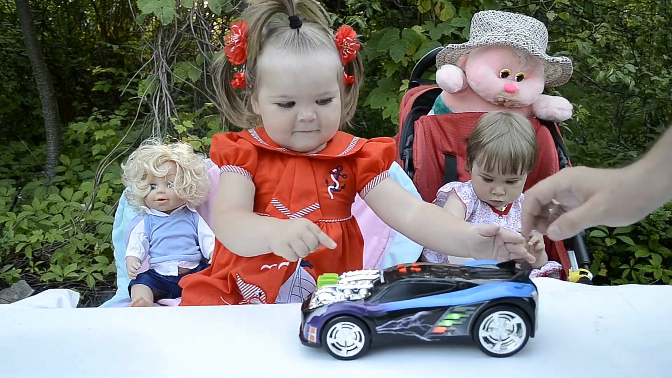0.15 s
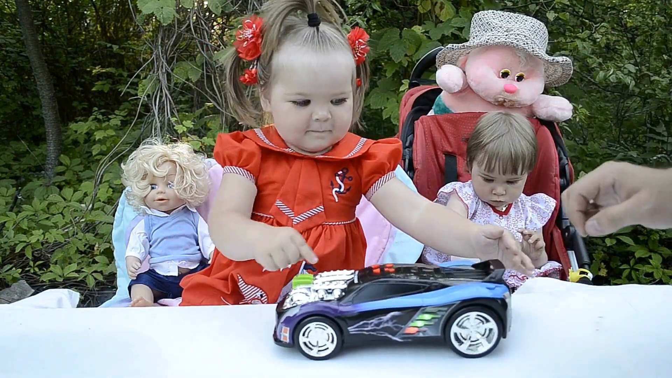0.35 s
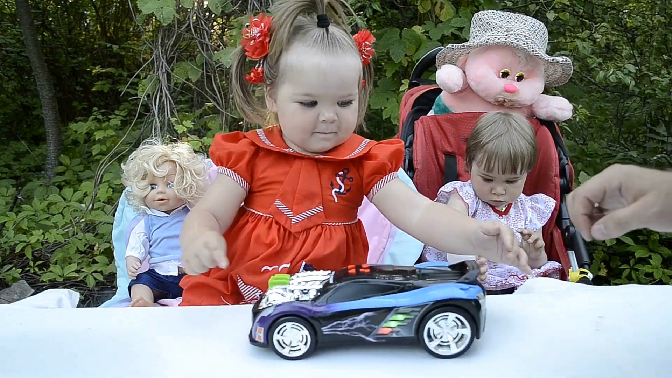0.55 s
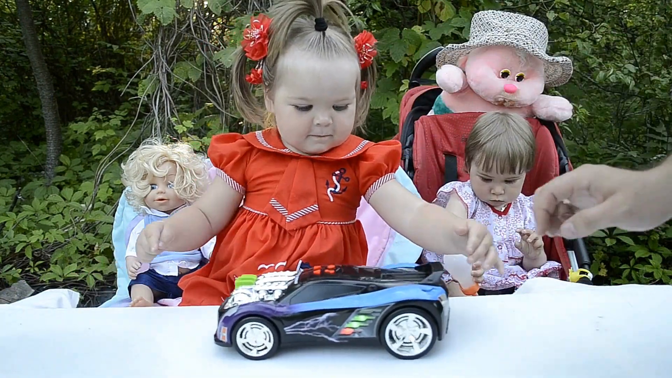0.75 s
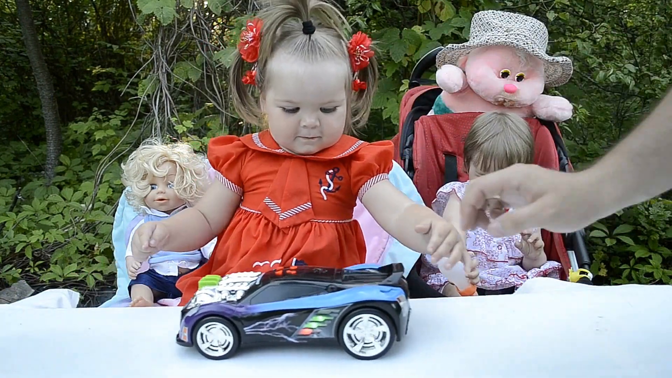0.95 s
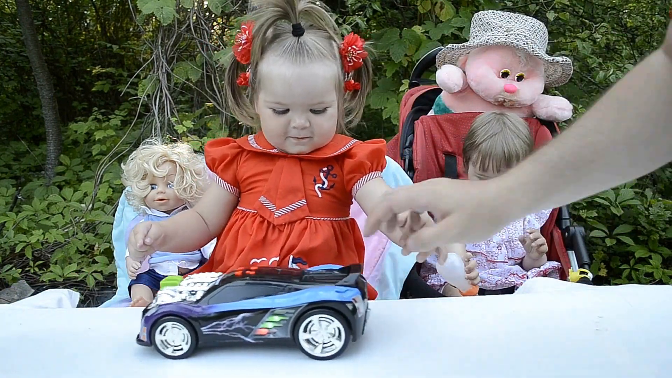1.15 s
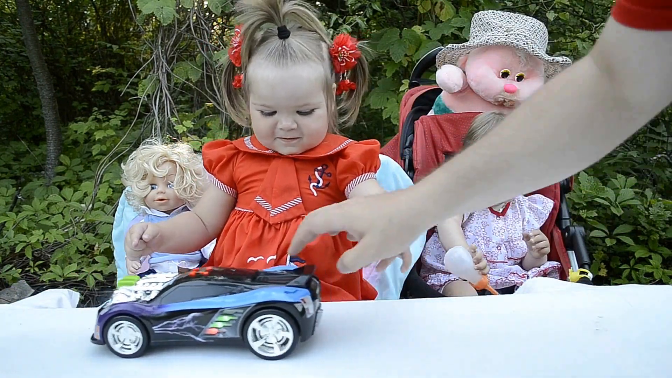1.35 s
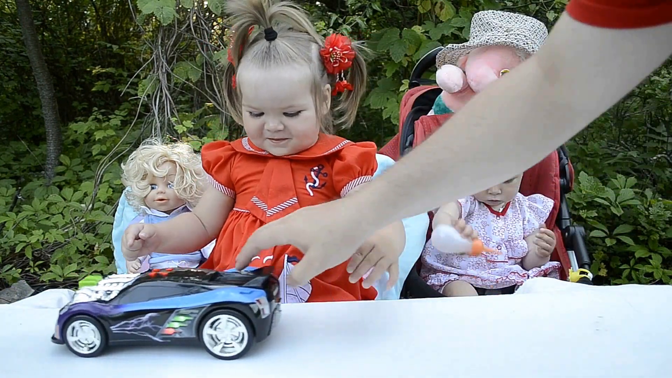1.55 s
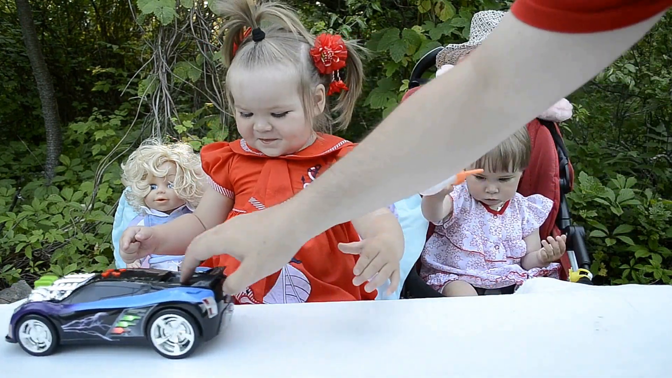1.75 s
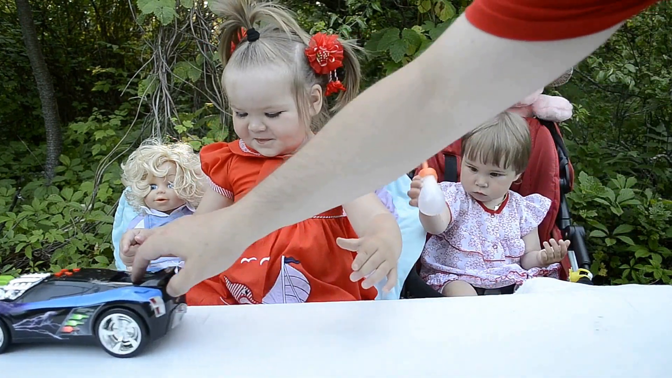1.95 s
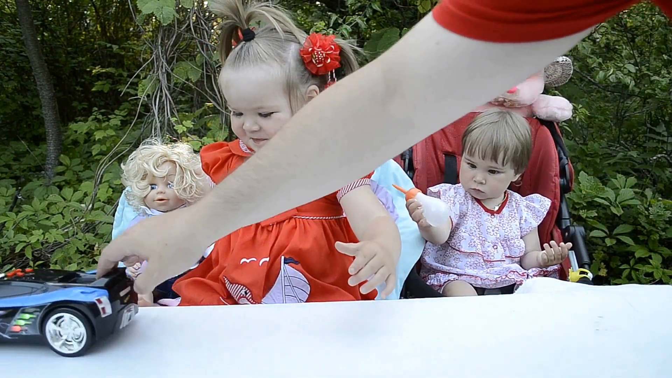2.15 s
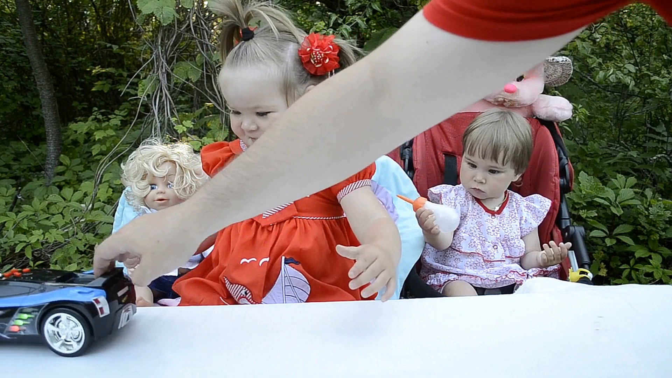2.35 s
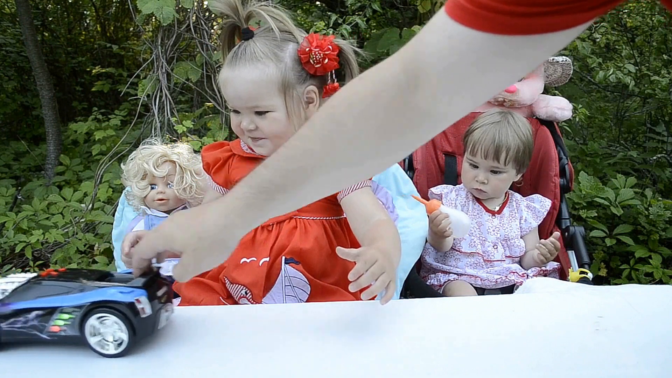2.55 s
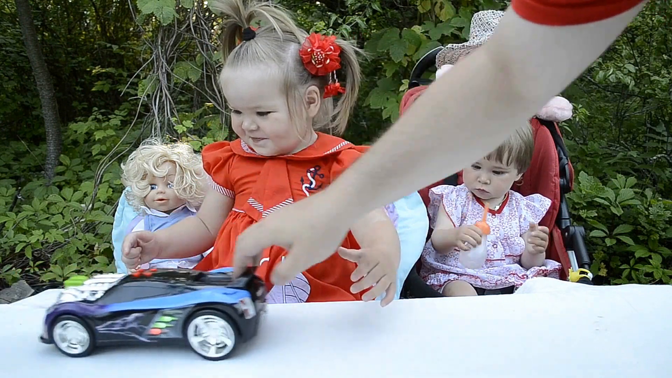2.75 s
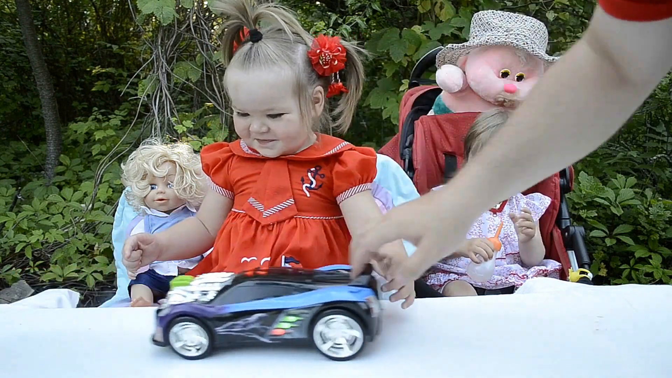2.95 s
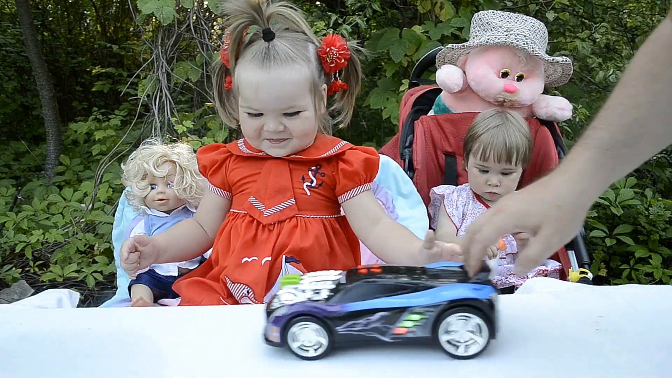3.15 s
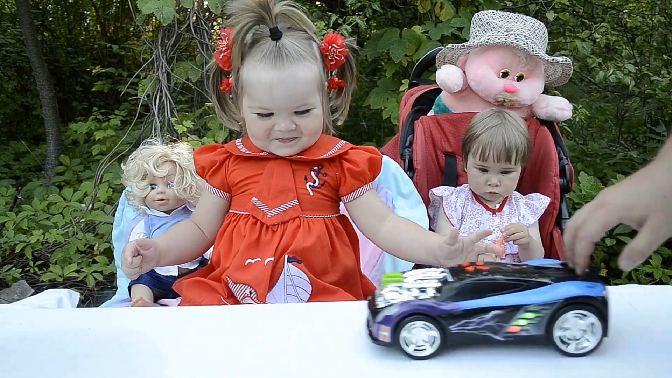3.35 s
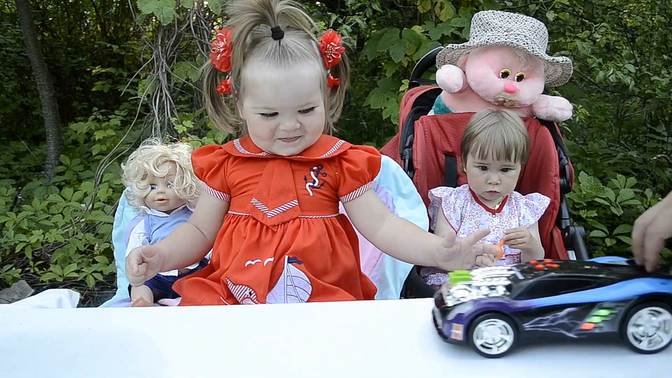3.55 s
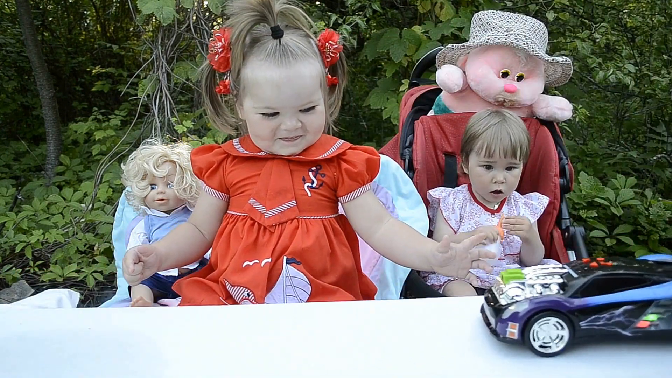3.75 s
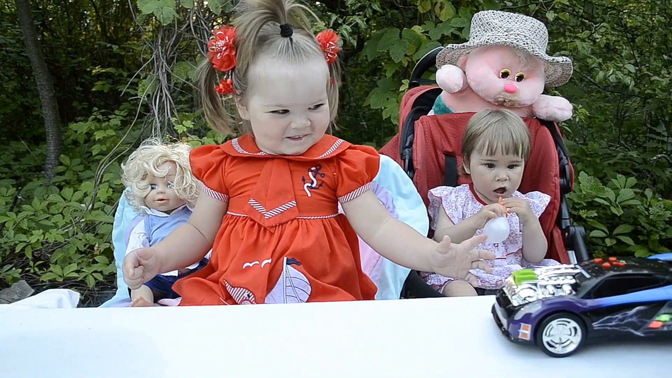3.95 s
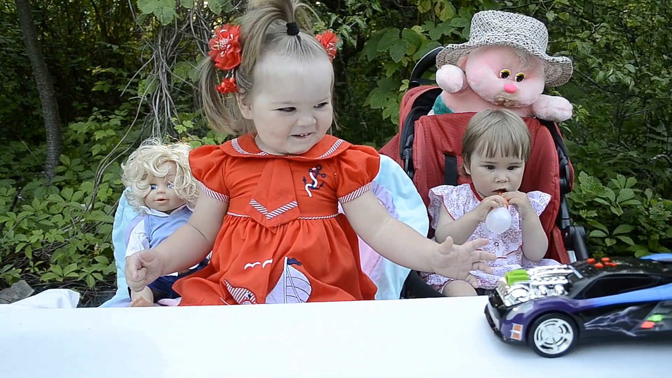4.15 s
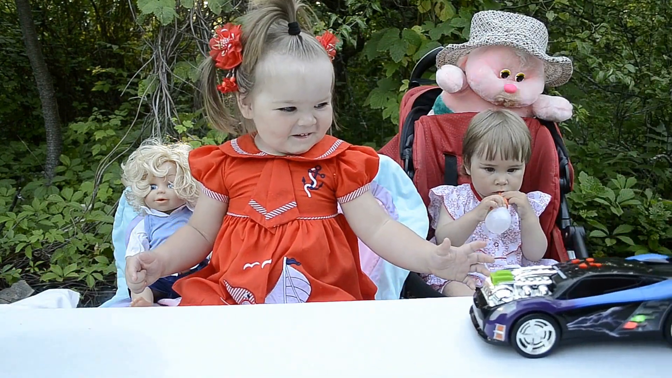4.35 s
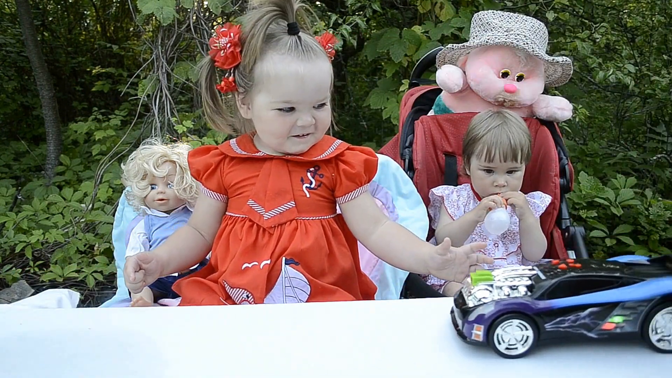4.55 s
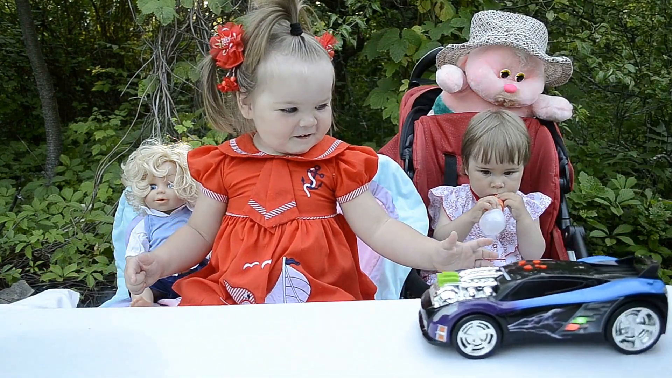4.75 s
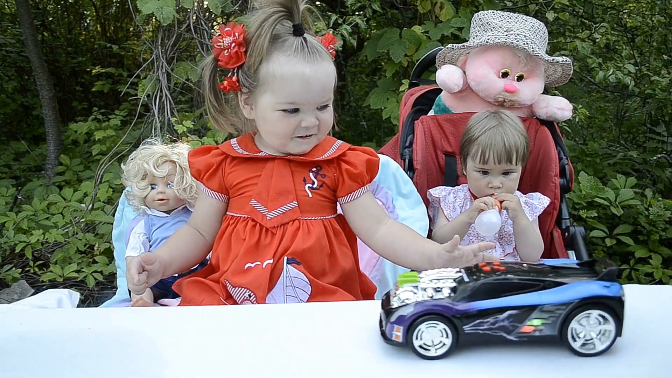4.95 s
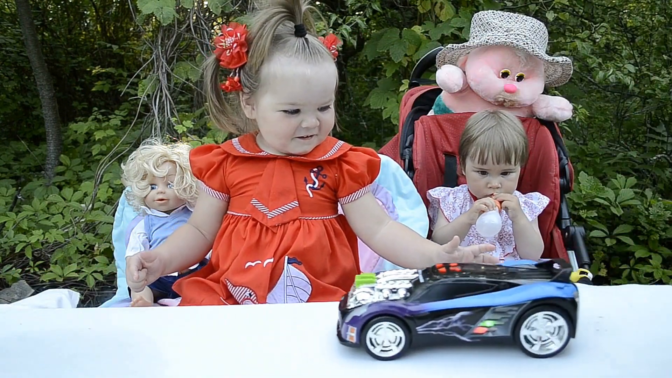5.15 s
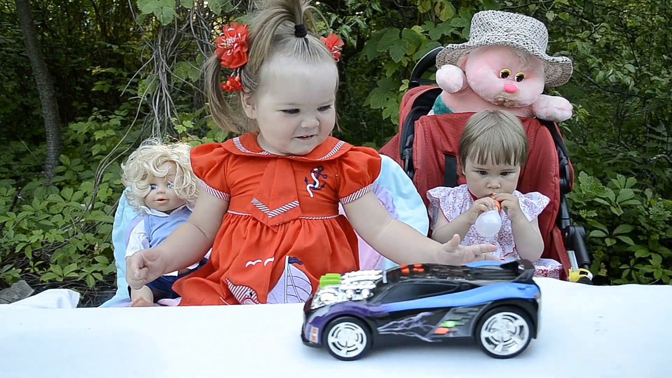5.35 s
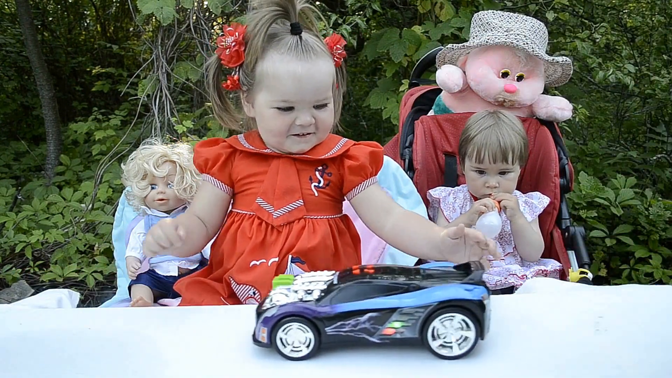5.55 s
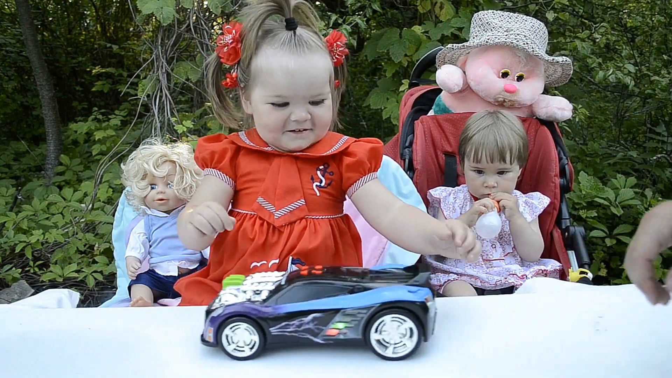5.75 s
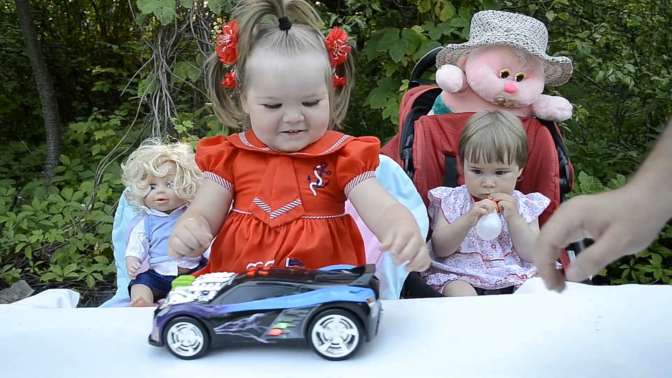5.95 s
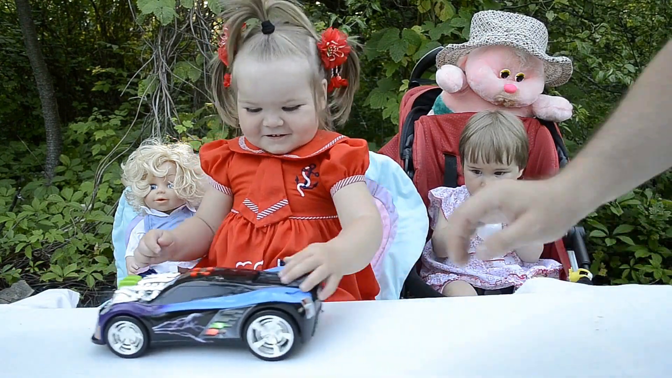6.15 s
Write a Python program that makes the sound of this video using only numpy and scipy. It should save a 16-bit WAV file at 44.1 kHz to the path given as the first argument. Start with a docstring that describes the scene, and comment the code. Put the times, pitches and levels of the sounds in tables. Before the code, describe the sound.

A plastic friction toy car is moved over a garden table, heard close and almost mono, above a steady, faint murmur of distant traffic and leaves. From about 0.8 to 2.3 seconds, short pushes make the gears chatter and knock inside the hollow shell, with a brief whirr near 1.5 seconds. Faint bird calls and whistles come between 0.7 and 1.8 seconds. At 2.6 seconds a long, fast pull begins, the loudest part: dense rattling, dry scraping and sharp knocks over a low table drone, with a thin rasp near 3.2 seconds. It fades by 3.8 seconds, followed by a few knocks around 4 seconds and a lull. From 4.8 seconds to just past 6, more short pushes bring uneven chatter, clicks and plastic ticks, the table rumbling softly near the end. A faint, low distant hum comes and goes from about 3 seconds.

```python
"""Toy car on a garden table

Close to an almost mono microphone, a plastic friction car is pushed to and fro over a table.
Its gear teeth and loose axles knock the hollow shell in uneven spells; the table top drones under
the wheels. Far traffic murmurs, a low hum comes and goes, and birds call from the bushes."""
import sys
import numpy as np
from scipy import signal
from scipy.fft import rfft, irfft, next_fast_len
from scipy.io import wavfile
from scipy.ndimage import uniform_filter1d, map_coordinates

SR = 44100
rng = np.random.default_rng(int(sys.argv[2]) if len(sys.argv) > 2 else 0)


def materialize(psi):
    """Save the field psi as 16-bit PCM at rate SR to the path in sys.argv[1].

    A 1-D psi becomes a single channel; in a 2-D psi each row is a channel.
    """
    bounded = np.clip(np.atleast_2d(psi).T, -1, 1)
    quanta = np.round(bounded * 32767).astype(np.int16)
    wavfile.write(sys.argv[1], SR, quanta)


N = 272979

# far traffic and leaves: frequency_hz, relative_db
MURMUR_SPECTRUM = [(32, -21), (55, -13.5), (122, -7), (143, -15), (310, -15.5), (441, -12.5), (602, -8),
                   (1140, -10.5), (1950, -17.5), (9390, -39), (11000, -53.5)]
# birds in the bushes, hoarse and whistled: start_s, length_s, from_hz, to_hz, peak_db
HOARSE_CALLS = [(0.731, 0.17, 6570, 6450, -70.5)]
WHISTLES = [(1.067, 0.056, 1960, 2180, -55.5), (1.158, 0.11, 3380, 2970, -61),
            (1.333, 0.09, 2221, 1956, -47.5), (1.41, 0.15, 2086, 1965, -58),
            (1.682, 0.12, 2420, 1964, -51.5)]
# short pushes, the last three columns relative to the chatter force:
# start_s, end_s, start_force_db, end_force_db, upper_shell_db, top_modes_db, scrape_db
PUSHES = [(0.814, 1.182, -43.5, -37.5, 1.5, 6, -31.5), (1.242, 1.52, -45.5, -50, 1, 4, -25),
          (1.537, 1.594, -36, -33, 0.5, 4, -43), (1.601, 1.792, -38, -39.5, 6.5, 12, -21.5),
          (2.064, 2.081, -46, -43, 11.5, -3, -27), (2.137, 2.261, -42, -39, 3, -12, -31),
          (4.836, 4.919, -57, -35.5, -4.5, -7, -43), (4.986, 5.089, -36.5, -31.5, -2.5, -9, -37.5),
          (5.126, 5.277, -32.5, -33.5, 6, 9, -39), (5.298, 5.508, -44, -47, -2, -12, -53),
          (5.826, 5.997, -34, -32.5, 1.5, 9.5, -28.5), (6.049, 6.142, -41, -35, 3.5, 8, -33.5)]
# the long fast pull, the last two relative to the force: time_s, force_db, upper_shell_db, scrape_db
LONG_PULL = [(2.582, -35, -1.5, -25.5), (2.65, -36, -21, -34.5), (2.757, -25.5, -21, -31),
             (2.798, -23.5, -20, -31), (2.811, -30, 6, -14), (2.9, -24.5, -1, -24), (3.12, -22, 1, -21.5),
             (3.18, -22.5, -4.5, -24), (3.32, -26.5, -11.5, -22), (3.45, -22.5, -4.5, -27),
             (3.53, -33.5, 2.5, -18), (3.61, -27, -9, -38), (3.84, -44, -18, -58)]
# start and end of the even push, and of the hand's hard drag backwards: time_s
EVEN_PUSH = [(1.51,), (1.78,)]
HAND_DRAG = [(2.8,), (3.55,)]
# dry rubbing of the teeth: frequency_hz, relative_db
SCRAPE_SPECTRUM = [(130, -35), (300, 2.5), (550, -15), (960, 2), (1180, -9), (2000, 3), (2180, -7.5),
                   (3250, -8), (3740, -9.5), (5080, -11.5), (6250, -13), (7840, -23), (9040, -16.5),
                   (11000, -35.5)]
# modes of the hollow shell: pitch_hz, width_hz, gain_db
SHELL_MODES = [(266, 190, -13.5), (368, 26.2, -1.5), (479.4, 65.3, 1), (674.3, 54.4, -0.5), (864, 56, -6),
               (985, 35, -7.5), (1071, 54, -23), (1307.6, 61, -1), (1426, 35, -10), (1610, 177, -7),
               (1815, 85, -8.5), (1990, 39, -15), (2770, 57, -32), (3280, 61, -28), (3624, 59, -31.5),
               (3834, 67, -28)]
# single knocks of gears and axles: time_s, force_db, upper_over_lower_db
KNOCKS = [(0.831, -9, -5), (0.971, -12.5, 11.5), (1.167, -7.5, -3), (1.346, -25, 13), (1.486, -30, 12),
          (1.507, -22, 21.5), (1.79, 0, -2), (2.059, -16, 3), (2.082, -22, -3), (2.134, -10, 9.5),
          (2.259, -20, -8), (2.606, -5, -13), (2.724, -1.5, -16), (2.784, 1.5, -6), (2.805, -5, 6.5),
          (2.828, 8, 0), (2.892, -3.5, 10), (2.951, 7.5, -0.5), (2.979, 1, 6.5), (3.005, -1.5, 10),
          (3.024, -2, 11.5), (3.047, 2, 10.5), (3.114, 4, 2.5), (3.124, 2, 8.5), (3.158, 4, -10),
          (3.267, 3.5, -4), (3.387, 1.5, 1.5), (3.423, 2, 8.5), (3.875, -3, -12), (3.888, -10, -21),
          (3.916, 1.5, 6), (3.981, -6, -9), (4.0, -5, 2), (4.18, -41, 28), (4.822, -16.5, 4),
          (4.978, -6, 3), (4.995, -6, 5), (5.038, -13, -4), (5.056, 1, -9), (5.145, -10, 5),
          (5.189, -5.5, 0), (5.205, -8.5, 6), (5.277, -4.5, 3.5), (5.637, -8.5, -2.5), (5.785, -6, 2.5),
          (5.822, -3, 1), (5.879, -7, 5), (5.99, 1, 2), (6.051, -24, 19), (6.094, -8.5, 7),
          (6.142, -14, 10)]
# spells of table drone, gear whirr, hum and flywheel rasp: start_s, end_s, start_db, end_db
DRONE_SPELLS = [(1.2, 1.675, -73.5, -57), (1.67, 2.266, -64.5, -67), (2.658, 2.834, -59, -53.5),
                (2.852, 3.664, -53.5, -58), (5.484, 6.196, -72, -54.5)]
WHIRR_SPELL = (1.5, 1.61, -56, -51)
HUM_SPELLS = [(3.04, 5.412, -71, -71), (5.72, 6.04, -67.5, -68)]
RASP_SPELL = (3.18, 3.36, -65, -62)
# strongest tone of the table top: time_s, pitch_hz
DRONE_PITCH = [(2.6, 165), (2.9, 185), (3.2, 173), (3.4, 153.4), (3.6, 136.5)]
# plastic ticking under the hand: time_s, pitch_hz, level_db
PLASTIC_TICKS = [(1.586, 3870, -52), (2.079, 3260, -56), (2.202, 3320, -57), (2.257, 5960, -56.5),
                 (2.578, 3780, -47.5), (2.58, 5720, -49), (2.604, 3980, -48), (2.605, 5800, -53),
                 (5.43, 1610, -41.5), (5.441, 1660, -44), (5.822, 3690, -50)]
# faint, fluttering stereo width of the near sounds: frequency_hz, gain_db
NEAR_WIDTH = [(350, -64.5), (800, -26.5), (1500, -26.5), (2500, -69), (9000, -44)]
# stereo width of the far bass: frequency_hz, gain_db
FAR_WIDTH = [(45, -19.0), (80, -6.5), (140, -14.5), (200, -37.5)]

PUSH_RISE_S, PUSH_FALL_S, RASP_FADE_S = 0.029, 0.076, 0.07
TIME_S = np.arange(N) / SR
BLOW_S = TIME_S[:SR // 20]  # time axis of one short impact


def amp(db):
    return np.exp(np.asarray(db) * (np.log(10) / 20))


def unit(x):
    return x / np.sqrt(np.mean(x ** 2) + 1e-20)


def spectrum(points, hz):
    """Gain at hz, from (frequency_hz, gain_db) points joined on a log axis."""
    point_hz, db = np.transpose(points)
    return amp(np.interp(np.log(hz + 1), np.log(point_hz + 1), db))


def curves(rows):
    """One value per sample for each column after the time."""
    times, *columns = np.transpose(rows)
    return [np.interp(TIME_S, times, column) for column in columns]


def gate(rows, fade_s):
    """1 from the first row's time to the last row's, fading outside them."""
    return np.clip(np.minimum(TIME_S - rows[0][0], rows[-1][0] - TIME_S) / fade_s + 1, 0, 1)


def spell(start, end, start_db, end_db, rise_s, fall_s):
    """A gain that fades in, slides between two levels and fades out."""
    edges = np.clip(np.minimum((TIME_S - start) / rise_s, (end - TIME_S) / fall_s) + 1, 0, 1)
    return amp(np.interp(TIME_S, [start, end], [start_db, end_db])) * edges ** 2


def wobble(rate):
    """A smooth random curve, rate knots a second."""
    return map_coordinates(rng.standard_normal(int(N * rate / SR) + 4), [TIME_S * rate])


def filtered(x, response):
    """x through a complex frequency response."""
    size = next_fast_len(N + SR // 2)
    return irfft(rfft(x, size) * response(np.fft.rfftfreq(size, 1 / SR)), size)[..., :N]


def ring(x, hz, width_hz, order=2):
    """x through one resonance; a higher order gives steeper flanks."""
    damping = 1j * width_hz * order
    return filtered(x, lambda f: (damping * f / (hz * hz - f * f + damping * f)) ** order)


def far_murmur():
    """Distant traffic and leaves: a steady bed of noise that breathes a little."""
    bins = signal.stft(rng.standard_normal(N), nperseg=512)[2]
    patches = uniform_filter1d(rng.standard_normal(bins.shape), 5, axis=0)
    patches = unit(uniform_filter1d(patches, 12, axis=1))
    noise = signal.istft(bins * amp(1.7 * patches), nperseg=512)[1][:N]
    return amp(-65 + 0.15 * wobble(0.6)) * unit(filtered(noise, lambda f: spectrum(MURMUR_SPECTRUM, f)))


def bird_call(start, length, from_hz, to_hz, peak_db, peak_share, flutter):
    """A gliding tone that swells until peak_share of its length and sinks again."""
    end = start + length
    hz = np.interp(TIME_S, [start, end], [from_hz, to_hz]) * (1 + flutter * wobble(90))
    db = peak_db + np.interp(TIME_S, [start, start + length * peak_share, end], [-12.5, 0, -12.5])
    return amp(db) * gate([[start], [end]], 0.0046) * np.sin(2 * np.pi * np.cumsum(hz) / SR)


def birds():
    """A hoarse call and whistles from the bushes, softened by echoes among the trees."""
    song = amp(1.5 * wobble(58.9))
    song *= sum(bird_call(*row, peak_share=0.59, flutter=0.00893) for row in WHISTLES)
    hoarse = 0.41 + wobble(450)
    hoarse *= sum(bird_call(*row, peak_share=0.45, flutter=0.008) for row in HOARSE_CALLS)
    calls, t = song + hoarse, TIME_S[:SR // 3]
    echo = rng.standard_normal(len(t)) * amp(-60 * t / 0.42)
    return calls + amp(-4.5) * signal.fftconvolve(calls, echo / np.linalg.norm(echo))[:N]


def hand_motion(pull_top_db=9.5):
    """The hand sets the chatter force on the lower, upper and top modes, and the scrape level."""
    force_db, upper_db, scrape_db = curves(LONG_PULL)
    force = amp(force_db) * gate(LONG_PULL, PUSH_RISE_S)
    drives = force * amp([np.zeros(N), upper_db, upper_db + pull_top_db, scrape_db])
    for start, end, start_db, end_db, *shares_db in PUSHES:
        push = spell(start, end, start_db, end_db, PUSH_RISE_S, PUSH_FALL_S)
        drives += push * amp([0, *shares_db])[:, None]
    return drives


def gear_teeth(jolts_per_s=60, taps_per_s=5000, scatter=0.8):
    """Uneven jolts bunch the dense taps of the teeth into chatter."""
    late, size = rng.random((N // 100, 2)).T
    onsets = ((np.arange(len(late)) + scatter * late) * SR / jolts_per_s).astype(int)
    # the jolts weaken from the flywheel rasp to the end of the pull, and in the even push
    calm = gate([RASP_SPELL, LONG_PULL[-1]], RASP_FADE_S) + gate(EVEN_PUSH, PUSH_RISE_S)
    jolts = np.bincount(onsets, size, N)[:N] * (1 - 0.6 * calm)
    clumps = 0.33 + signal.fftconvolve(jolts, amp(-60 * BLOW_S / 0.039))[:N]
    taps = (rng.random(N) < taps_per_s / SR) * rng.standard_normal(N)
    taps *= amp(1.62 * rng.exponential(1, N))
    return jolts, taps, unit(clumps * taps)


def dry_scrape(level, chatter, jolts, clicks, drag, free_snap_db=-47, drag_snap_db=-31.5):
    """Teeth rub; jolts and knocks snap dryly, the knocks harder under the drag."""
    rub = unit(chatter + 0.31 * rng.standard_normal(N)) + amp(24) * jolts ** 2
    snaps = amp(free_snap_db + drag * (drag_snap_db - free_snap_db)) * clicks
    return filtered(level * rub + snaps, lambda f: unit(spectrum(SCRAPE_SPECTRUM, f)))


def shell(lower, upper, top, thumps, clicks, drag, belly_hz=505, roof_hz=1820, gripped_hz=1090):
    """Each mode of the shell rings at its own changing strength as the contact point moves."""
    sound = np.zeros(N)
    for k, (hz, width_hz, db) in enumerate(SHELL_MODES):
        drift = wobble(45)
        contact = amp(3 * drift)
        if hz > 2500:  # top modes
            force = amp(5.4 * drift) * (top + amp(-4) * clicks)
        elif hz > 800:  # thin upper shell: gripped, it rings lower and over more modes
            free_loss_db = 19.5 * abs(np.log2(hz / roof_hz))
            gripped_loss_db = 3 * abs(np.log2(hz / gripped_hz))
            loss_db = free_loss_db + drag * (gripped_loss_db - free_loss_db)
            force = contact * upper + clicks * amp(0.73 * drift - loss_db)
        else:  # lower shell
            force = contact * lower + thumps * amp(1.73 * drift - 5.7 * abs(np.log2(hz / belly_hz)))
        if 1030 < hz < 1180:  # the chassis mode wakes under the drag
            force *= amp(13 * drag)
        sound += (-1) ** k * amp(db) * ring(force, hz, width_hz)
    return sound


def knocks():
    """Gears and axles strike and briefly rattle: thumps for the lower shell, clicks for the upper."""
    thumps, clicks = np.zeros((2, N + SR))
    rattle = amp(-22.5 - 60 * BLOW_S / 0.041)
    for start, db, upper_db in KNOCKS:
        blow = rattle * rng.standard_normal(len(BLOW_S))
        blow[0] = 1
        clicks[round(start * SR):][:len(blow)] += amp(db + upper_db) * blow
        thumps[round(start * SR):][:len(blow)] += amp(db) * blow
    return thumps[:N], clicks[:N]


def toy_car():
    """The car, close up: tooth chatter and single knocks ring its hollow shell."""
    lower, upper, top, scrape_level = hand_motion()
    jolts, taps, chatter = gear_teeth()
    thumps, clicks = knocks()
    drag = gate(HAND_DRAG, PUSH_RISE_S)
    scrape = dry_scrape(scrape_level, chatter, jolts, clicks, drag)
    ticking = chatter + amp(28.5) * jolts
    body = shell(lower * chatter, upper * chatter, top * ticking, thumps, clicks, drag)
    return body + scrape + gear_whirr(taps) + flywheel_rasp() + plastic_ticks()


def table_drone():
    """The board rumbles under the wheels, with one wavering tone during the long pull."""
    hz = curves(DRONE_PITCH)[0] * (1 + 0.0206 * wobble(20))
    tone = np.sin(2 * np.pi * np.cumsum(hz) / SR) * amp(1.9 * wobble(22.4))
    rumble = ring(rng.standard_normal(N), hz=138.3, width_hz=55, order=3) * amp(2.36 * wobble(14))
    level = np.max([spell(*row, rise_s=0.21, fall_s=0.21) for row in DRONE_SPELLS], axis=0)
    return level * (0.95 * gate(DRONE_PITCH, 0.038) * unit(tone) + unit(rumble))


def gear_whirr(taps):
    """Even tooth contacts sing on one mode of the gearbox."""
    return spell(*WHIRR_SPELL, PUSH_RISE_S, PUSH_RISE_S) * unit(ring(taps, hz=1277, width_hz=56))


def plastic_ticks(attack_s=0.0016, t60_s=0.025):
    """The plastic ticks under the hand, each time a short, slightly rough ring on one pitch."""
    sound = np.zeros(N + SR)
    for start, hz, db in PLASTIC_TICKS:
        phase = 2 * np.pi * hz * BLOW_S + np.cumsum(0.043 * rng.standard_normal(len(BLOW_S)))
        envelope = amp(db - 60 * BLOW_S / t60_s) * (1 - np.exp(-BLOW_S / attack_s))
        sound[round(start * SR):][:len(BLOW_S)] += envelope * np.sin(phase)
    return sound[:N]


def far_hum(pitch_hz=45.6):
    """A low, wavering hum comes and goes in the distance."""
    phase = 2 * np.pi * np.cumsum(pitch_hz + 0.5 * wobble(2.9)) / SR
    level = sum(spell(*row, rise_s=0.091, fall_s=0.091) for row in HUM_SPELLS)
    return np.sqrt(2) * level * np.sin(phase)


def flywheel_rasp():
    """The flywheel gear rasps as the pull slows: a high, grainy band of noise."""
    grains = rng.standard_normal(N) * amp(1.4 * wobble(200))
    return spell(*RASP_SPELL, RASP_FADE_S, RASP_FADE_S) * unit(ring(grains, hz=6200, width_hz=400))


def scene():
    """The garden from beside the table, with a faint stereo width, most in the far bass."""
    near = toy_car() + table_drone() + birds()
    far = far_murmur() + far_hum()
    side = filtered(far, lambda f: spectrum(FAR_WIDTH, f))
    side += wobble(9) * filtered(near, lambda f: spectrum(NEAR_WIDTH, f))
    return np.array([near + far - side, near + far + side])


def record(dry):
    """The camera keeps nothing above its band limit."""
    return filtered(dry, lambda hz: hz < 11100)


dry = scene()
out = record(dry)
materialize(out)
```